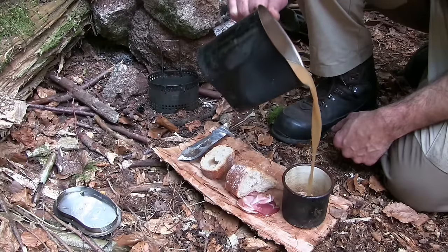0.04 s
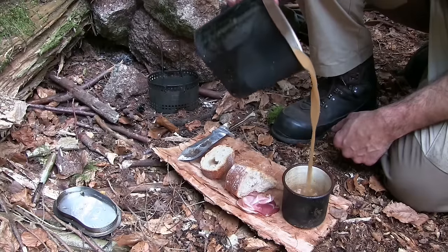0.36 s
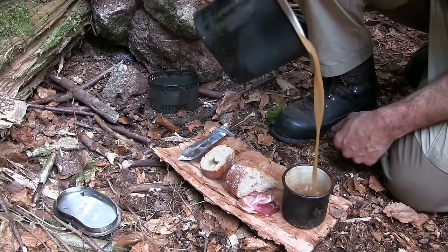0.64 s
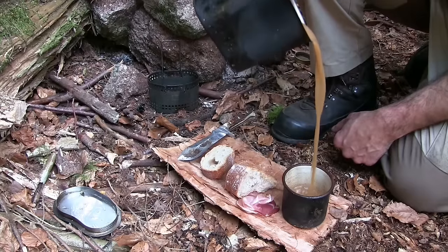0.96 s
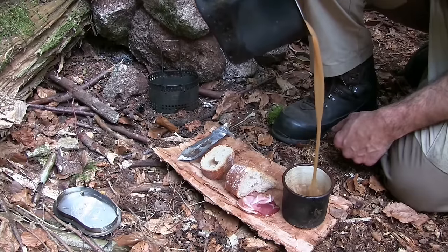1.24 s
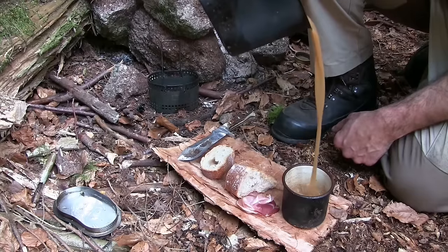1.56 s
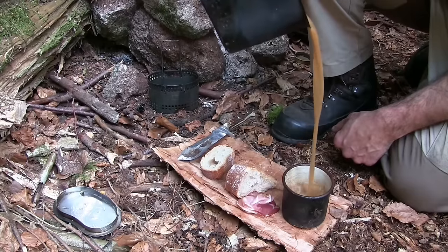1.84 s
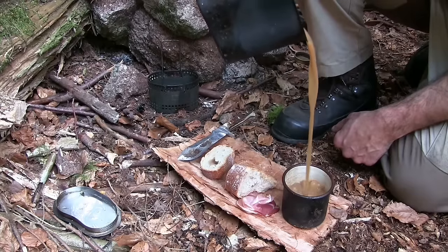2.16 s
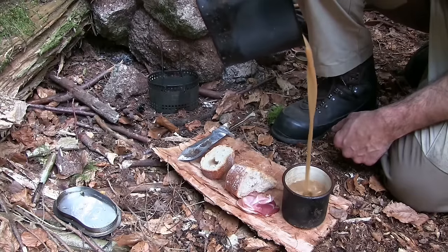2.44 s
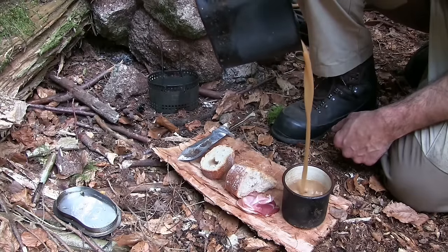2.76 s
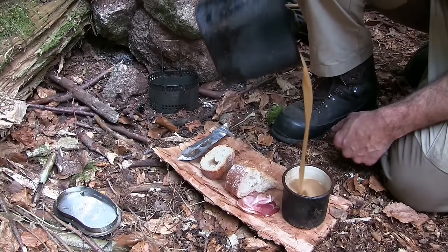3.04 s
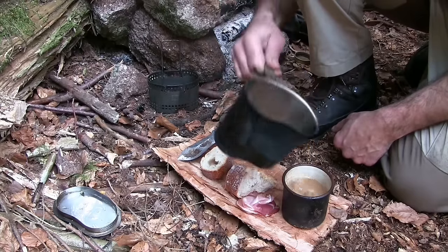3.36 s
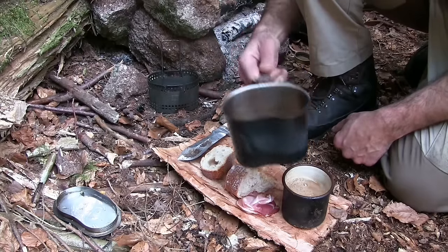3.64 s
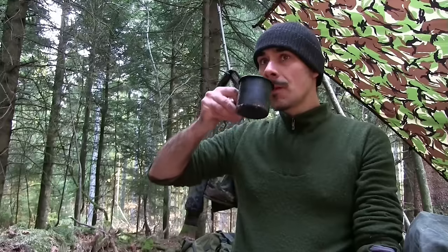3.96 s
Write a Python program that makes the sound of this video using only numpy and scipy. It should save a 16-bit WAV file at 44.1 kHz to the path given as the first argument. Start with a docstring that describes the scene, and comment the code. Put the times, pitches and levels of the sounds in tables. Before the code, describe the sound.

Coffee pours into a small metal cup from the start, splashing and gurgling with snapping droplets and a faint metallic ring. From about 0.8 seconds one resonance rises as the cup fills while a lower one sinks. Two sharper drops crack at around 1.2 and 1.4 seconds. The stream breaks at 3.4 seconds, and a sleeve rustles softly until 3.8. A faint forest hush continues throughout.

```python
"""Pouring coffee in the forest

Coffee falls from a raised pot into a small metal cup on the forest floor; the stream breaks at 3.4 s.
It drives in pockets of air that ring two short resonances of the cup: one rises as the cup fills,
one sinks as froth builds. Droplets snap and crackle on the surface. A sleeve rustles as the pot
is lowered, and the forest hushes behind."""
import sys
import numpy as np
from scipy import signal
from scipy.fft import rfft, irfft, next_fast_len
from scipy.io import wavfile
from scipy.ndimage import map_coordinates

SR = 44100
rng = np.random.default_rng(int(sys.argv[2]) if len(sys.argv) > 2 else 0)


def transcribe(signal):
    """Save signal, clipped to [-1, 1], as a 16-bit WAV file at the path in sys.argv[1]."""
    frames = np.atleast_2d(signal).T
    limited = np.clip(frames, -1, 1)
    pcm = np.round(limited * 32767).astype(np.int16)
    wavfile.write(sys.argv[1], SR, pcm)


N = 176400
T = np.arange(N) / SR
TOP_HZ = 15800
LN_1000 = np.log(1000)  # a 60 dB decay, as an exponent

# big air pockets (time [s], upper resonance [relative dB], lower resonance [relative dB])
BIG_POCKETS = [(0.0194, -19, -52), (0.033, -21, -52), (0.063, -19, -53), (0.1255, -18.5, -53),
               (0.1433, -20.5, -54), (0.247, -20, -48), (0.266, -21, -48), (0.473, -24, -27),
               (0.7387, -10.5, -20.5), (0.751, -16, -21.5), (0.7692, -14, -22.5), (0.8546, -13.5, -45),
               (0.884, -22.5, -23), (0.9677, -20, -20), (1.0483, -25, -16), (1.1429, -14, -22),
               (1.207, -11, -13.5), (1.279, -11.5, -16.5), (1.4561, -16, -13), (1.5596, -12, -18.5),
               (1.76, -16.5, -27), (1.7706, -15, -14), (1.7886, -13.5, -23), (1.809, -35, -16),
               (1.8653, -11, -14.5), (1.8789, -19, -15), (1.8886, -9.5, -14), (1.9823, -11.5, -19),
               (2.0204, -17, -18), (2.1443, -23, -24), (2.1854, -12.5, -16.5), (2.208, -15, -24),
               (2.2697, -16, -39), (2.3618, -13, -21), (2.565, -13, -41), (2.5885, -15, -38),
               (2.6186, -14.5, -19), (2.645, -18, -21), (2.738, -13, -12), (2.7724, -15.5, -24),
               (2.808, -19, -14), (2.9002, -12.5, -40), (2.9229, -13.5, -31), (3.0472, -17, -33),
               (3.115, -11.5, -24), (3.229, -16, -20), (3.3313, -11.5, -16), (3.3714, -14, -32)]
# loud droplet snaps (time [s], level [relative dB], pitch [Hz])
DROPLET_SNAPS = [(0.0537, -11, 2760), (0.1425, -22, 4200), (0.2531, -12, 2560), (0.328, -15, 2780),
                 (0.474, -15.5, 3730), (0.7697, -14, 3380), (0.8545, -12, 3650), (0.91, -16.5, 3120),
                 (1.0877, -16.5, 3800), (1.1062, -13, 4460), (1.1844, -13, 4170), (1.1965, -15, 3020),
                 (1.2001, -8.5, 3800), (1.3024, -14, 4940), (1.616, -15.5, 4300), (1.738, -17, 3520),
                 (1.75, -14, 4700), (2.0133, -16.5, 4850), (2.2101, -16.5, 3900), (2.3044, -17, 3470),
                 (2.55, -14.5, 2970), (2.7964, -20, 3360), (3.0783, -18, 5340), (3.0852, -18, 6060),
                 (3.229, -14.5, 3200), (3.3315, -21, 2220), (3.3522, -21, 3160), (3.372, -15.5, 3000)]


def flow(stop_s=3.375, spray_late_s=0.033, surge_db=2, fall_db_per_s=372):
    """Gains of the four churn layers: they surge together and fall as the stream breaks, spray last."""
    # steady churn (time [s], then lower resonance, upper resonance, crackle, spray [relative dB])
    churn = [(0, -75, -39, -31.5, -45), (.18, -87, -39, -34.5, -63), (.38, -54, -42, -33.5, -49),
             (.62, -50.5, -44.5, -34, -41), (.85, -44.5, -38, -32, -66), (1.15, -37, -34.5, -34, -49),
             (1.45, -39.5, -39, -35.5, -43), (1.85, -33.5, -34.5, -33.5, -46.5),
             (2.1, -35.5, -34.5, -38.5, -43.5), (2.5, -36, -31.5, -36, -43), (2.8, -38.5, -32, -42.5, -44),
             (3.1, -35.5, -34.5, -40.5, -66), (3.36, -41, -36, -37.5, -65)]
    stops = stop_s + np.array([0, 0, 0, spray_late_s])[:, None]
    fall_db = fall_db_per_s * np.maximum(T - stops, 0)
    return amp(np.array(at(churn, T)) + surge_db * wobble(per_s=50) - fall_db)


def gurgle(lower_level, upper_level):
    """The stream drives in big air pockets over a churn of small ones."""
    s, upper_db, lower_db = np.transpose(BIG_POCKETS)
    upper, lower = pockets(s, amp(upper_db + 3.5), amp(lower_db + 5.5))
    s, gain, _ = shower(per_s=260, range_db=9, skew=2.7)
    small_upper, small_lower = pockets(s, gain, gain * amp(3.3 * rng.standard_normal(len(s))))
    return upper + lower + upper_level * unit(small_upper) + lower_level * unit(small_lower)


def pockets(s, upper_gain, lower_gain, spread=0.073, attack=0.33, overtone_ratio=2.25):
    """Air pockets ring both resonances around the pitches that the filling has reached."""
    # resonances of the filling cup (time [s], upper [Hz], lower [Hz], t60 of the upper [s])
    filling = [(0, 943, 840, 0.03), (.35, 918, 760, 0.027), (.75, 937, 593, 0.0099),
               (1.2, 1096, 470, 0.0083), (1.8, 1175, 348, 0.013), (2.3, 1303, 322, 0.0061),
               (2.8, 1484, 283, 0.0063), (3.4, 1466, 256, 0.0076)]
    upper_hz, lower_hz, t60 = at(filling, s)
    length = t60 / t60.min()  # a longer ring is truer in pitch and slower to build
    upper_hz *= np.exp(spread * rng.standard_normal(len(s)) / np.sqrt(length))
    lower_hz *= np.exp(spread * rng.standard_normal(len(s)))
    upper = pings(s, upper_hz, t60, upper_gain, attack * length[:, None], size=1800)
    hollow = amp(-5.5) * (t60 / t60.max()) ** 2  # froth soon damps the empty cup's overtone
    overtone = pings(s, overtone_ratio * upper_hz, t60, hollow * upper_gain, attack=1.4, size=1800)
    lower = pings(s, lower_hz, t60=0.014, gain=lower_gain, attack=attack, size=1000)
    return upper + overtone, lower


def bubbles(level, cycles=19, rise=0.055):
    """Bubbles ring with a rising pitch: a few loud ones and a swarm."""
    # single ringing bubbles (time [s], level [relative dB], pitch [Hz])
    blips = [(0.099, -20, 2030), (0.1639, -14.5, 2760), (0.341, -17.5, 1250), (3.2, -20, 3080),
             (3.2969, -19, 2180)]
    s, db, hz = np.transpose(blips)
    loud = pings(s, hz, cycles / hz, amp(db + 6.5), attack=0.7, size=900, rise=rise)
    births = shower(per_s=380, range_db=-1.0, skew=2.6)
    swarm = droplets(*births, hz=2280, spread=0.317, cycles=cycles, rise=rise, size=900)
    return loud + amp(-3.5) * level * unit(swarm)


def splash(level, spray_level, froth_top_hz=9500, low_cut_hz=1060):
    """Slaps, snaps, spurts and sharp ticks of spray over a crackle and fizz that the froth muffles."""
    crackle = droplets(*shower(per_s=750, range_db=21.5, skew=1.24), hz=3800, spread=0.34, cycles=7.9)
    fizz = droplets(*shower(per_s=5400, range_db=4.5, skew=4.4), hz=4400, spread=0.4, cycles=10.5)
    ticks = droplets(*shower(per_s=220, range_db=30, skew=2.2), hz=8200, spread=0.28, cycles=5)
    froth = amp(-2.5) * unit(crackle) + amp(-14) * unit(fizz)
    froth = filtered(froth, lambda hz: causal(1 / np.sqrt(1 + (hz / froth_top_hz) ** 10)))
    drops = slaps() + snaps() + spurts() + level * froth + spray_level * unit(ticks)
    return filtered(drops, lambda hz: (1j * hz / (low_cut_hz + 1j * hz)) ** 2)


def slaps():
    """A fat drop lands flat with one hard, broad crack."""
    # fat drops (time [s], level [relative dB])
    landings = [(1.1996, -0.5), (1.3776, 1.5)]
    # resonances of the crack (pitch [Hz], level [relative dB], t60 [s])
    modes = [(1910, 5.5, 0.0018), (3780, 5, 0.0022), (8600, 2.5, 0.00057)]
    s, db = np.transpose(landings)
    return sum(pings(s, np.full(len(s), hz), t60, amp(db + mode_db), attack=0.72, size=260)
               for hz, mode_db, t60 in modes)


def snaps(cycles=5.53, count=5, spray_s=0.004):
    """A droplet smacks the surface and throws up a few smaller ones."""
    s, db, hz = np.transpose(DROPLET_SNAPS)
    smack = pings(s, hz, cycles / hz, amp(db + 15.5), attack=0.9, size=260)
    s, db, hz = np.repeat(DROPLET_SNAPS, count, axis=0).T
    s = s + spray_s * rng.random(len(s))
    return smack + droplets(s, amp(db + 2.5), rng.standard_normal(len(s)), hz, spread=0.6, cycles=4.7)


def spurts(count=12, length_s=0.004):
    """A bursting bubble throws a tight cluster of tiny droplets, densest at first."""
    # spurts of fine spray (time [s], level [relative dB])
    clusters = [(0.0535, -28.5), (0.1415, -12), (0.327, -20), (0.444, -9), (0.4745, -10), (0.629, -14),
                (0.6634, -14.5), (0.9012, -15), (1.2538, -8), (1.302, -20), (2.339, -27), (2.42, -13),
                (2.588, -17), (2.6457, -13), (2.7352, -18.5), (2.7962, -14), (2.8975, -11), (3.0225, -17.5),
                (3.1847, -16.5), (3.2301, -17), (3.321, -23), (3.388, -24), (3.403, -19.5)]
    s, db = np.repeat(clusters, count, axis=0).T
    s = s + length_s * rng.random(len(s)) ** 2
    return droplets(s, amp(db + 4.5), rng.standard_normal(len(s)), hz=8800, spread=0.33, cycles=4.5)


def droplets(s, gain, deviate, hz, spread, cycles, rise=0, size=260):
    """Tiny bubbles, scattered in pitch around hz, ring for a few cycles."""
    pitch = np.clip(hz * np.exp(spread * deviate), 500, TOP_HZ)
    return pings(s, pitch, cycles / pitch, gain, attack=0.48, size=size, rise=rise)


def patter(level, t60=0.002):
    """Lumps of the stream land with short noisy cracks; big pockets and snaps start with one too."""
    # colour of the impacts (frequency [Hz], gain [dB])
    colour = [(400, -23), (1000, -0.5), (2500, 3), (5000, 0.5), (9000, -2.5), (16000, -7.5)]
    decay = np.exp(-LN_1000 * T[:900] / t60)

    def bursts(s, gain):
        hits = np.bincount((s * SR).astype(int), gain, N)
        return signal.fftconvolve(hits, decay)[:N] * rng.standard_normal(N)

    s, gain, _ = shower(per_s=77, range_db=18, skew=2)
    loud_s, loud_db, _ = np.vstack([BIG_POCKETS, DROPLET_SNAPS]).T
    cracks = amp(-6) * level * unit(bursts(s, gain)) + bursts(loud_s, amp(loud_db - 4))
    return filtered(cracks, lambda hz: causal(amp(along(colour, hz))))


def cup(x):
    """The metal cup colours the pour and rings faintly with it."""
    # colour of the mouth and wall (frequency [Hz], gain [dB])
    colour = [(60, -26), (150, -7.5), (330, -5), (450, -4.5), (610, 3.5), (680, -5.5), (780, -8),
              (900, 1.5), (1400, -3), (1800, 0), (2100, -1.5), (2550, -4), (3050, 2.5), (3500, -1.5),
              (4200, -3), (5700, 1), (6500, -2.5), (7100, -1), (8200, -2), (9300, 1), (10200, -4),
              (13000, -8.5), (16000, -27)]
    # wall modes (pitch [Hz], t60 [s], peak over the direct sound [dB])
    wall_modes = [(652, 0.03, -2), (913, 0.021, -3), (1070, 0.17, 1), (1366, 0.1, 3.5), (1514, 0.047, -0.5),
                  (1953, 0.21, 1.5), (2090, 0.079, 5.5), (2245, 0.13, 4.5), (2423, 0.15, -2.5),
                  (3120, 0.15, -1), (4134, 0.044, 3), (9100, 0.0099, -6)]

    def response(f):
        ring = 0
        for hz, t60, db in wall_modes:
            width_hz = LN_1000 / np.pi / t60
            ring += amp(db) * 1j * f * width_hz / (hz * hz - f * f + 1j * f * width_hz)
        return (1 + ring) * causal(amp(along(colour, f)))

    return filtered(x, response)


def clearing(x, near_t60=0.011, far_t60=0.43, far_db=-24, left_lag_s=3.6e-5, count=4):
    """The cup stands to the right; rocks and ground scatter its sound and the trees answer faintly."""
    # reflections from rocks and ground (frequency [Hz], gain [dB])
    scatter = [(150, -13.5), (600, -8), (1400, -15), (3000, -7.5), (7000, -1), (14000, 1.5)]
    # stereo balance (frequency [Hz], left minus right [dB])
    balance = [(100, -1), (220, 2), (600, -3.5), (1300, -2.5), (3000, -2.5), (5200, -3.5), (6200, 4),
               (7500, -7), (9100, 2.5), (10300, -1.5), (14000, -1)]
    t = T[:SR // 3]
    decay = np.exp(-LN_1000 * t / near_t60) + amp(far_db) * np.exp(-LN_1000 * t / far_t60)
    decay *= t > 0.0005  # pre-delay
    tails = rng.standard_normal((count, 2, len(t))) * decay / np.linalg.norm(decay)
    # the splash wanders between spots, each with its own tail
    spots = np.array([wobble(per_s=150) for _ in range(count)])
    sends = x * spots / np.linalg.norm(spots, axis=0)
    wet = signal.fftconvolve(sends[:, None], tails, axes=2).sum(0)[:, :N]
    wet = filtered(wet, lambda hz: amp(along(scatter, hz)))
    sides = np.array([[0.5], [-0.5]])
    delay_s = sides * left_lag_s
    return filtered(x + wet, lambda hz: amp(sides * along(balance, hz)) / np.exp(2j * np.pi * hz * delay_s))


def sleeve():
    """A sleeve's soft rustle, which dies away once the pot is lowered."""
    # colour of the cloth (frequency [Hz], density [relative dB])
    colour = [(200, -13.5), (500, 4), (1400, 1.5), (2400, -5.5), (4300, -4.5), (8000, -15.5), (15000, -23)]
    # rustle envelope, held from the start until its first point (time [s], level [dB])
    fader = [(3.2, -39), (3.4, -42.5), (3.6, -46), (3.73, -44), (3.755, -50), (3.78, -72)]
    return amp(at(fader, T)[0]) * stereo_noise(colour)


def swish(width_hz=1800):
    """Ribbed cloth slides with a narrow hiss whose pitch follows the arm's speed."""
    # the sleeve's sliding weave (time [s], centre [Hz], level [dB])
    slide = [(3.42, 3400, -51), (3.57, 4500, -53), (3.7, 7030, -57), (3.75, 6160, -49), (3.78, 6000, -80)]
    hz, db = at(slide, T)
    phase = 2 * np.pi * np.cumsum(hz) / SR
    return amp(db) * np.array([unit(wobble(width_hz) * np.sin(phase)) for _ in range(2)])


def forest():
    """The forest's steady hush."""
    # colour of the hush (frequency [Hz], density [relative dB])
    colour = [(20, -24), (38, -30), (56, -4.5), (100, -5.5), (400, -1.5), (1200, -6), (1800, -9.5),
              (2100, -6.5), (2600, -12), (6000, -17), (12000, -22.5), (16000, -41)]
    return amp(-46) * stereo_noise(colour)


def stereo_noise(colour):
    """Coloured noise of rms 1, centred in the bass and wider above."""
    # stereo image (frequency [Hz], left-right correlation [0..1])
    likeness = [(60, 0.99), (300, 0.31), (1400, 0.47), (3500, 0.42), (8000, 0.46)]

    def response(hz):
        angle = np.arccos(along(likeness, hz)) / 2
        return amp(along(colour, hz)) * [np.cos(angle), np.sin(angle)]

    mid, side = filtered(rng.standard_normal((2, N)), response)
    return unit(np.array([mid + side, mid - side]))


def pings(s, hz, t60, gain, attack, size, rise=0):
    """Damped sines at times s, size samples long, that swell for attack cycles and glide up by rise."""
    t = np.arange(size) / SR
    cycles, age = hz[:, None] * t, t / np.reshape(t60, (-1, 1))
    glide = 1 + rise * np.minimum(age, 1) / 2
    envelope = np.exp(-LN_1000 * age) * (1 - np.exp(-cycles / attack))
    waves = -gain[:, None] * np.sin(2 * np.pi * cycles * glide) * envelope
    where = (s * SR).astype(int)[:, None] + np.arange(size)
    return np.bincount(where.ravel(), waves.ravel(), N)[:N]


def shower(per_s, range_db, skew):
    """Random times, gains (most near 0 dB, few near range_db) and Gaussian pitch deviates."""
    when, size, radius, angle = rng.random((int(per_s * N / SR), 4)).T
    deviate = np.sqrt(-2 * np.log(1 - radius)) * np.cos(2 * np.pi * angle)
    return when * N / SR, amp(range_db * size ** skew), deviate


def wobble(per_s):
    """A smooth random curve."""
    return map_coordinates(rng.standard_normal(int(N * per_s / SR) + 4), [T * per_s])


def amp(db):
    """Decibels to gain."""
    return 10 ** (np.asarray(db) / 20)


def unit(x):
    """Scale to rms 1."""
    return x / np.sqrt(np.mean(x ** 2) + 1e-20)


def along(points, hz):
    """Read a curve of (frequency, value) points on a log axis."""
    knots, values = np.transpose(points)
    return np.interp(np.log(hz + 1), np.log(knots + 1), values)


def at(rows, s):
    """The columns of a curve at the times s."""
    knots, *columns = np.transpose(rows)
    return [np.interp(s, knots, column) for column in columns]


def filtered(x, response):
    """Filter x with a complex response of frequency."""
    size = 2 * next_fast_len(N // 2 + 8192)
    return irfft(rfft(x, size) * response(np.fft.rfftfreq(size, 1 / SR)), size)[..., :N]


def causal(gain):
    """The minimum-phase response with this gain."""
    cepstrum = irfft(np.log(gain + 1e-6))
    half = len(cepstrum) // 2
    cepstrum[1:half] *= 2
    cepstrum[half + 1:] = 0
    return np.exp(rfft(cepstrum))


def scene():
    """The pour in its cup and clearing, with sleeve and forest behind."""
    lower, upper, crackle, spray = flow()
    pour = gurgle(lower, upper) + bubbles(crackle) + splash(crackle, spray) + patter(crackle)
    return clearing(cup(pour)) + forest() + sleeve() + swish()


def record(dry):
    """A brick-wall low-pass trims the very top."""
    return filtered(dry, lambda hz: hz < TOP_HZ)


dry = scene()
out = record(dry)
transcribe(out)
```